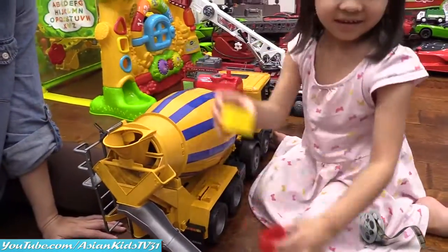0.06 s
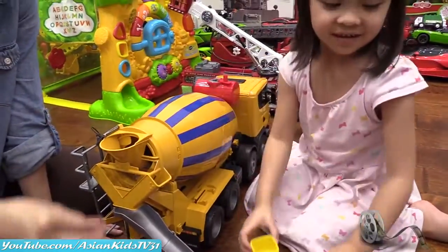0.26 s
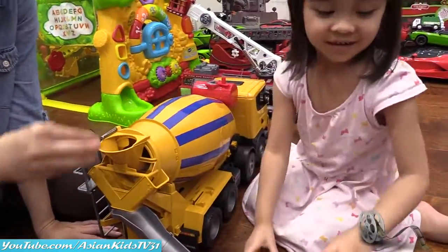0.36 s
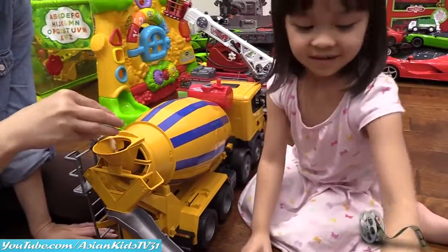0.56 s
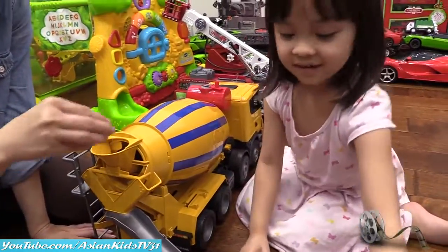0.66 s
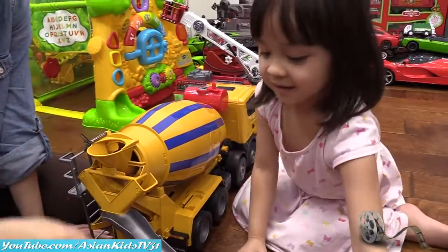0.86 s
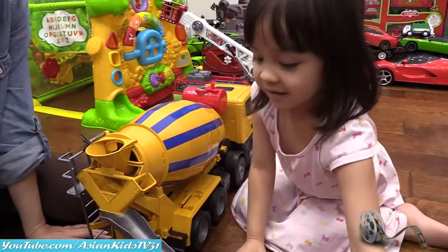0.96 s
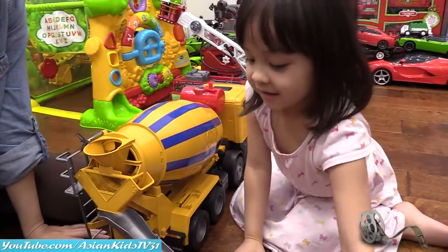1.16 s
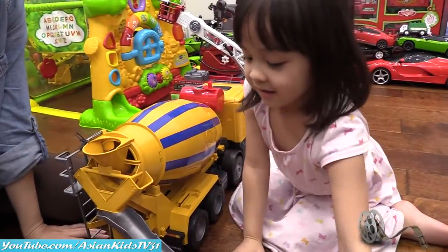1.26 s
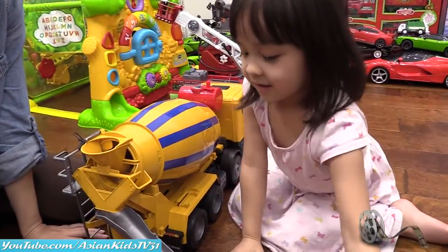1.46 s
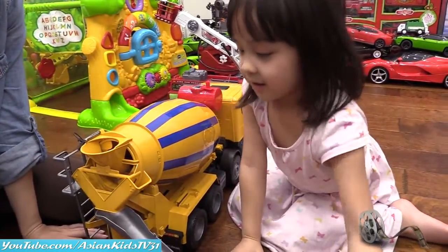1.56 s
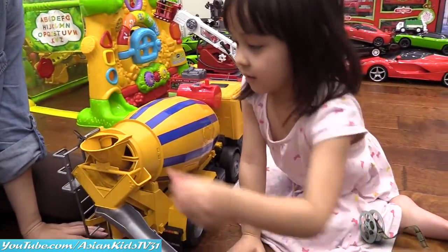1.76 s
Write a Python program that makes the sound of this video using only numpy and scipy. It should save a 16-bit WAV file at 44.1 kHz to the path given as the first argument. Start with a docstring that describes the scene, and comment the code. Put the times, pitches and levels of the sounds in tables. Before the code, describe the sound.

Hard plastic toys clatter: cups clack on a wooden floor, pellets tumble in a hollow drum

```python
"""Hard plastic toys in a lively room: hollow cups clack down and skitter as the wooden boards thump.
Pellets then tick on a chute and tumble and knock inside a plastic drum, drifting to the right.
Duller, muffled clacks follow, then a last few weak knocks. Blows ring tuned modes; noise bursts add
the crack; random small collisions make the skitter and tumble. Noise echoes form the room,
over faint air and a thin whine. A close recorder with a fast limiter takes it in."""
import sys
import numpy as np
from scipy import signal
from scipy.io import wavfile

SR = 44100
rng = np.random.default_rng(int(sys.argv[2]) if len(sys.argv) > 2 else 0)


def master(y):
    """Save y as 16-bit WAV."""
    cut = np.clip(np.atleast_2d(y).T, -1, 1)
    pcm = np.round(cut * 32767)  # scale
    wavfile.write(sys.argv[1], SR, pcm.astype(np.int16))


def ratio(d):
    """dB to gain"""
    e = np.asarray(d, float) / 20
    return 10 ** e


N = 79380

# All levels in the tables are relative, set against each other in the mix.
# cups clacking down on the floor: (time [s], level [dB], strongest ring [Hz], bright snap [dB])
CUP_CLACKS = [(0.2276, 5, 2307, -5), (0.2354, 7, 3693, -10), (0.455, -2, 2287, -10),
              (.4695, -6.5, 2060, -23), (1.3995, -7.5, 2127, -12), (1.402, -7, 2960, -36),
              (1.4424, -19.5, 2310, -19), (1.573, -17, 1790, -31)]
# modes of the hollow cup: (frequency [Hz], level [dB], t60 [s])
CUP_MODES = [(867, -3, 0.017), (1255, -2, 0.015), (1710, 7.5, 0.0038), (2081, 5.5, 0.034),
             (2440, 1.5, 0.017), (3050, -10, 0.022), (3670, -14.5, 0.035), (5410, -4, 0.0088),
             (8600, -22, 0.016)]
# spectrum of the cup's crack: (frequency [Hz], density [dB per Hz])
CUP_CRACK_SPECTRUM = [(88, -41), (150, -12), (850, -10), (1600, -11.5), (2140, -4), (3830, -5.5),
                      (4750, -30), (7270, -18), (12800, -59), (15500, -89)]
# cups skittering on after landing: (time [s], level [dB])
SKITTER_CURVE = [(.24, -82), (.26, -10), (.36, -24.5), (.42, -50), (.47, -22.5), (.53, -33.5), (.6, -49),
                 (1.39, -40), (1.41, -24), (1.52, -37), (1.6, -51)]
# soft thumps on the boards: (time [s], level [dB], strongest ring [Hz])
BOARD_THUDS = [(0.2270, -15.5, 273), (0.4554, -36, 247), (1.298, -40, 248), (1.389, -24.5, 286),
               (1.407, -30.5, 607), (1.574, -31.5, 217)]
# modes of the wooden boards: (frequency [Hz], level [dB], t60 [s])
BOARD_MODES = [(147, 0, 0.052), (240, 8.5, 0.047), (300, 5, 0.1), (460, -7, 0.016), (598, 3, 0.02)]
# pellets ticking on the chute: (time [s], level [dB])
CHUTE_TICKS = [(0.6653, -7), (0.6775, -8), (0.7006, -32), (0.704, -15), (0.7241, -16), (1.061, -21),
               (1.1502, -24), (1.1896, -25.5)]
# modes of the chute: (frequency [Hz], level [dB], t60 [s])
CHUTE_MODES = [(910, -14, 0.06), (2680, -8, 0.0085), (5180, -6.5, 0.012), (6550, 1.5, 0.0056),
               (7620, 6, 0.014), (8200, -3.5, 0.011), (8910, -3, 0.012), (12040, -5, 0.0066)]
# spectrum of the chute's crack: (frequency [Hz], density [dB per Hz])
CHUTE_CRACK_SPECTRUM = [(88, -66), (150, -34), (600, -24), (912, -4.5), (1700, -10.5), (2550, -6),
                        (4840, -26.5), (7560, 0.5), (15500, -50)]
# pellets knocking on the drum wall:
# (time [s], level [dB], strongest ring [Hz], hollow boom [dB], burst length [s])
DRUM_KNOCKS = [(0.702, -7, 3330, -51, 0.0042), (0.7265, -1.5, 2930, -39, 0.0064),
               (0.8028, -0.5, 3470, -18, 0.0025), (0.821, -3, 3240, -15.5, 0.0046),
               (0.856, 2.5, 2133, -39, 0.0034), (0.8789, -3, 2090, -24.5, 0.0024),
               (0.8867, -7, 2200, -44, 0.0096), (0.9289, 0, 2900, -49, 0.0048),
               (1.016, -10.5, 2720, -53, 0.0031), (0.9480, -24, 2136, -26.5, 0.0069),
               (1.0747, 0, 3050, -58, 0.0031), (1.0887, -0.5, 2830, -45, 0.0032),
               (1.1182, 3, 2792, -52, 0.0036), (1.188, -7, 2870, -45, 0.0061),
               (1.2316, -11.5, 2330, -63, 0.0057), (1.2878, -11.5, 2680, -48, 0.0032),
               (1.72, -19, 2900, -51, 0.0033), (1.7396, -22, 2730, -75, 0.0029)]
# modes of the drum wall: (frequency [Hz], level [dB], t60 [s])
DRUM_MODES = [(1478, -18.5, 0.05), (1823, -6.5, 0.019), (2200, -11.5, 0.031), (2486, -0.5, 0.012),
              (2900, -0.5, 0.0064), (3254, -7, 0.019), (4380, -13.5, 0.008), (6310, -4.5, 0.0026)]
# hollow of the drum: (frequency [Hz], level [dB], t60 [s])
BOOM_MODES = [(791, -3.5, 0.084), (855.4, -1, 0.088)]
# spectrum of the drum's crack: (frequency [Hz], density [dB per Hz])
DRUM_CRACK_SPECTRUM = [(88, -72), (150, -63), (631, -36), (860, -11), (948, -16.5), (2860, -5), (5330, -21),
                       (8490, -16.5), (15500, -68)]
# loose pellets tumbling in the drum: (time [s], level [dB])
TUMBLE_CURVE = [(0, -41), (.1, -85), (.2, -81), (.65, -65), (.68, -20), (.76, -47), (.8, -22), (.9, -24.5),
                (1.0, -61), (1.06, -22), (1.12, -22), (1.25, -36.5), (1.35, -44), (1.5, -68)]
# the drum drifts to the right: (time [s], left minus right [dB])
DRUM_PAN_CURVE = [(.75, 2), (1.3, -5)]
# decay of the room: (frequency [Hz], t60 [s])
ROOM_DECAY = [(100, 0.94), (300, 0.17), (800, 0.59), (2000, 0.6), (5000, 0.57), (12000, 0.27)]
# colour of the echoes: (frequency [Hz], level [dB])
ROOM_SPECTRUM = [(100, -31), (300, -2), (800, -1), (2000, 1.5), (5000, 0.5), (12000, 5)]
# spectrum of the room tone: (frequency [Hz], density [dB per Hz])
ROOM_TONE_SPECTRUM = [(30, -14), (70, -8), (180, -1.5), (450, -4), (1000, -6.5), (1400, -12.5),
                      (1900, -11.5), (2600, -10), (5000, -29.5), (16000, -43)]

UNEVEN_DB, STAGGER_S = 2, 0.002    # how modes differ from blow to blow, in strength and start
OWN_RING_T60_S = 0.028
SNAP_LOW_CUT_HZ, SNAP_S = 4430, 0.0015
MUFFLED_FROM_S, MUFFLE_HZ = 1.38, 3370    # the later clacks are duller, the cup held in a hand
SKITTER_PER_S, TUMBLE_PER_S = 500, 400    # mean collisions per second, for each mode
PELLET_LOW_CUT_HZ = 490
CUP_PAN_DB, BOARDS_PAN_DB, CHUTE_PAN_DB = -3, 4.5, 3    # left minus right
ROOM_DB, ROOM_LIKENESS, ROOM_BUILD_S = -1.5, 0.3, 0.01
ROOM_TONE_DB = -45.5
WHINE_HZ, WHINE_DB = 1875, -50.5
MIC_LOW_CUT_HZ, TOP_CUT_HZ = 106, 16300
CEILING_DB, ATTACK_S, RELEASE_DB_PER_S = -2.5, 0.00076, 248


def cups():
    """Clacks ring the hollow cup and crack and snap brightly; small collisions then skitter on."""
    s, db, hz, snap_db = np.transpose(CUP_CLACKS)
    cup = struck(s, db - 16, CUP_MODES)
    cup = cup + own_rings(s, db - 3, hz)
    cup = cup + crack(s, db + 5, 0.0032, CUP_CRACK_SPECTRUM)
    cup = cup + rattle(SKITTER_CURVE, SKITTER_PER_S, CUP_MODES, CUP_CRACK_SPECTRUM, dry_db=-2)
    dull = signal.sosfilt(signal.butter(2, MUFFLE_HZ, fs=SR, output="sos"), cup)
    cup = np.where(np.arange(N) / SR < MUFFLED_FROM_S, cup, dull)
    # the snap stays bright throughout
    snap = crack(s, snap_db, SNAP_S, [(100, 4), (6000, -6), (15000, -25)])
    return placed(cup + high(snap, SNAP_LOW_CUT_HZ), CUP_PAN_DB)


def boards():
    """The wooden floor thumps: its low modes ring, and one favoured mode swells softly."""
    s, db, hz = np.transpose(BOARD_THUDS)
    thump = struck(s, db - 9, BOARD_MODES) + swelling_rings(s, db, hz, 0.0038)
    return placed(thump, BOARDS_PAN_DB)


def drum():
    """Pellets knock the drum wall, boom in its hollow and tumble as many small collisions."""
    s, db, hz, boom_db, length_s = np.transpose(DRUM_KNOCKS)
    wall = struck(s, db - 10, DRUM_MODES)
    wall = wall + swelling_rings(s, db - 8.5, hz, 0.56 * length_s)
    wall = wall + crack(s, db + 5, length_s, DRUM_CRACK_SPECTRUM)
    boom = struck(s, boom_db, BOOM_MODES)
    tumble = rattle(TUMBLE_CURVE, TUMBLE_PER_S, DRUM_MODES, DRUM_CRACK_SPECTRUM, dry_db=-4)
    return placed(high(wall + boom + tumble, PELLET_LOW_CUT_HZ), in_time(DRUM_PAN_CURVE))


def chute():
    """Pellets tick on the chute: bright short modes and a burst of crack."""
    s, db = np.transpose(CHUTE_TICKS)
    ticks = struck(s, db - 3.5, CHUTE_MODES) + crack(s, db + 4, 0.0049, CHUTE_CRACK_SPECTRUM)
    return placed(high(ticks, PELLET_LOW_CUT_HZ), CHUTE_PAN_DB)


def struck(s, db, modes):
    """Every blow sets each mode ringing with a strength of its own, not quite together."""
    out = np.zeros(N)
    for hz, mode_db, t60 in modes:
        starts = s + STAGGER_S * rng.random(len(s))
        strengths_db = db + mode_db + UNEVEN_DB * rng.standard_normal(len(s))
        out += ring(clicks(starts, strengths_db), hz, t60)
    return out


def own_rings(s, db, hz):
    """The spot that is hit favours one mode."""
    return sum(ring(clicks([a], b), c, OWN_RING_T60_S) for a, b, c in zip(s, db, hz))


def swelling_rings(s, db, hz, rise_s):
    """A softer contact: the favoured mode swells for a moment, then dies."""
    t = np.maximum(np.arange(N)[:, None] / SR - s, 0)
    x = t / rise_s
    swell = x * np.exp(1 - x)    # reaches 1 at rise_s
    tone = np.sin(2 * np.pi * (hz * t + rng.random(len(s))))
    return (ratio(db) * swell * tone).sum(axis=1)


def crack(s, db, length_s, spectrum):
    """Too many short modes to count: a coloured noise burst that swells and dies."""
    shape = np.zeros(N)
    for at, level_db, length in np.broadcast(s, db, length_s):
        t = np.maximum(np.arange(N) / SR - at, 0) / length
        shape += ratio(level_db) * np.sqrt(t) * np.exp(-t ** 2 / 2)
    return coloured(shape * rng.standard_normal(N), spectrum)


def rattle(curve, per_s, modes, spectrum, dry_db):
    """Random small collisions into the modes of a body, with their dry patter."""
    def grains():
        strength = ratio(4 * np.minimum(rng.exponential(1, N), 4))    # 0 to 16 dB, mostly weak
        return strength * rng.choice([-1, 1], N) * (rng.random(N) < per_s / SR)
    rings = sum(ratio(mode_db) * ring(grains(), hz, t60) for hz, mode_db, t60 in modes)
    patter = coloured(grains(), spectrum)
    return ratio(in_time(curve)) * (rms_one(rings) + ratio(dry_db) * rms_one(patter))


def ring(push, hz, t60):
    """A damped resonator: a unit click sets a sine of height about 1 ringing."""
    r, w = ratio(-60 / (t60 * SR)), 2 * np.pi * hz / SR
    return signal.lfilter([0, np.sin(w)], [1, -2 * r * np.cos(w), r * r], push + 1e-18)


def clicks(s, db):
    """One click of random sign per blow."""
    out = np.zeros(N)
    np.add.at(out, (np.asarray(s) * SR).astype(int), ratio(db) * rng.choice([-1, 1], len(s)))
    return out


def placed(x, pan_db):
    """Left or right, by a level difference alone."""
    return x * ratio(pan_db * np.array([[.5], [-.5]]))


def high(x, hz):
    """Steep low cut."""
    return signal.sosfilt(signal.butter(4, hz, "high", fs=SR, output="sos"), x)


def coloured(x, spectrum):
    """Shape by a spectrum through the filter bank, neighbouring bands in opposite sign."""
    return sum((-1) ** k * signal.sosfilt(sos, x + 1e-18) * ratio(at_hz(spectrum, hz))
               for k, (hz, sos) in enumerate(bands()))


def bands():
    """Half-octave filters and their centres."""
    edges = 30 * 2 ** np.arange(0, 9.6, .5)
    return [(np.sqrt(a * b), signal.butter(2, [a, b], "band", fs=SR, output="sos"))
            for a, b in zip(edges, edges[1:])]


def at_hz(points, hz):
    """A spectrum read on a log frequency axis."""
    point_hz, value = np.transpose(points)
    return np.interp(np.log(hz), np.log(point_hz), value)


def in_time(rows):
    """A curve joined by straight lines."""
    return np.interp(np.arange(N) / SR, *np.transpose(rows))


def rms_one(x):
    """Scale to rms 1."""
    return x / np.sqrt(np.mean(x ** 2) + 1e-20)


def pair(length, alike):
    """Left and right noises, partly alike: their correlation is alike."""
    mid, side = rng.standard_normal((2, length))
    return np.sqrt(1 + alike) * mid + np.sqrt(1 - alike) * side * [[1], [-1]]


def room(x):
    """Dense noise echoes build up and die band by band."""
    t = np.arange(SR) / SR
    # neighbouring bands take separate noises
    white = [pair(SR, ROOM_LIKENESS), pair(SR, ROOM_LIKENESS)]
    echo = np.zeros((2, SR))
    for k, (hz, sos) in enumerate(bands()):
        decay_db = at_hz(ROOM_SPECTRUM, hz) - 60 * t / at_hz(ROOM_DECAY, hz)
        echo += signal.sosfilt(sos, white[k % 2]) * ratio(decay_db)
    build_up = 1 - np.exp(-(t / ROOM_BUILD_S) ** 2)
    echo = echo * build_up / np.sqrt(SR / 20)
    return signal.fftconvolve(echo, x.mean(0)[None], axes=1)[:, :N]


def room_tone():
    """Faint steady air of the house: shaped stereo noise."""
    white = [pair(N, 0.83), pair(N, 0.56)]
    air = sum(signal.sosfilt(sos, white[k % 2]) * ratio(at_hz(ROOM_TONE_SPECTRUM, hz))
              for k, (hz, sos) in enumerate(bands()))
    return ratio(ROOM_TONE_DB) * rms_one(air)


def house_whine():
    """A faint whine in the house: noise through one narrow resonance."""
    return ratio(WHINE_DB) * rms_one(ring(rng.standard_normal(N), WHINE_HZ, 0.027))


def scene():
    """Toys, their room, the room tone and the whine."""
    toys = cups() + boards() + drum() + chute()
    return toys + ratio(ROOM_DB) * room(toys) + room_tone() + house_whine()


def roll_off(x):
    """The treble ends steeply here."""
    return signal.sosfilt(signal.butter(12, 16510, fs=SR, output="sos"), x)


def record(dry):
    """The microphone loses bass; a limiter clamps just after each peak, which may clip; the top is cut."""
    dry = signal.sosfilt(signal.butter(2, MIC_LOW_CUT_HZ, "high", fs=SR, output="sos"), dry)
    over_db = np.maximum(20 * np.log10(np.abs(dry).max(0) + 1e-9) - CEILING_DB, 0)
    # hold each overshoot and let it fall in a straight line of dB
    fall_db = RELEASE_DB_PER_S * np.arange(N) / SR
    held_db = np.maximum.accumulate(over_db + fall_db) - fall_db
    # the attack lags, so the front of a peak slips through
    keep = np.exp(-1 / (ATTACK_S * SR))
    cut_db = signal.lfilter([1 - keep], [1, -keep], held_db)
    clipped = np.clip(dry * ratio(-cut_db), -.9, .9)
    mix = signal.sosfilt(signal.cheby2(12, 70, TOP_CUT_HZ, fs=SR, output="sos"), clipped)
    return roll_off(mix)


dry = scene()
out = record(dry)
master(out)
```